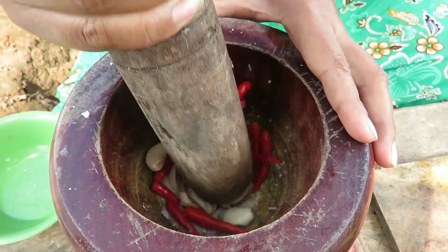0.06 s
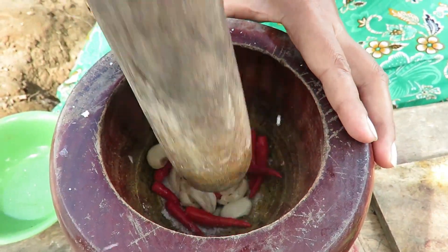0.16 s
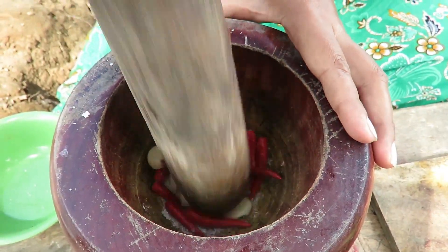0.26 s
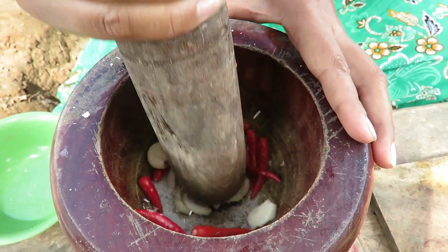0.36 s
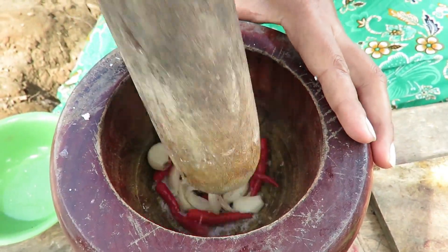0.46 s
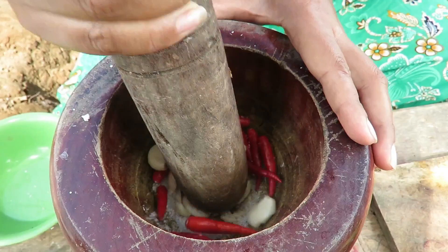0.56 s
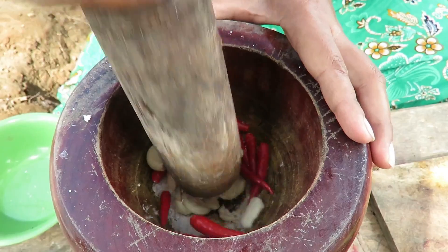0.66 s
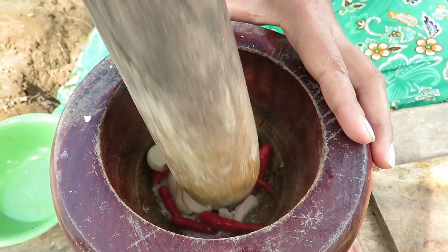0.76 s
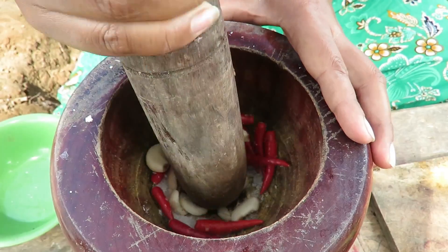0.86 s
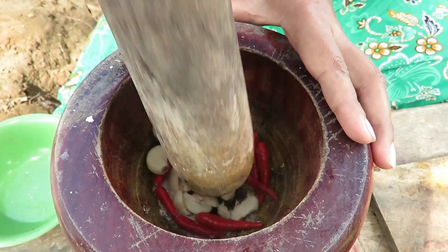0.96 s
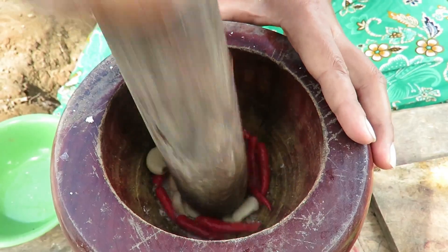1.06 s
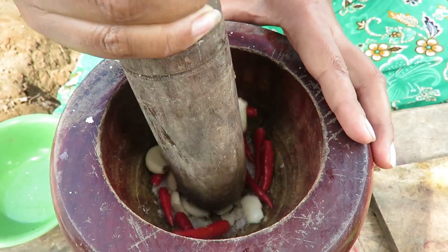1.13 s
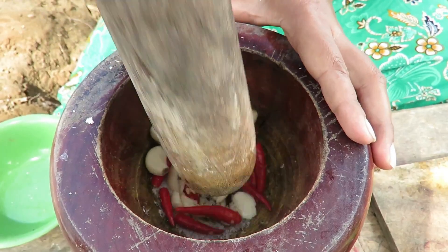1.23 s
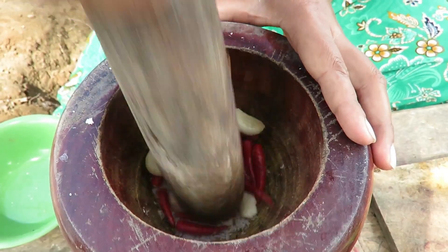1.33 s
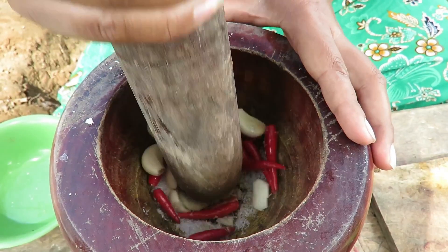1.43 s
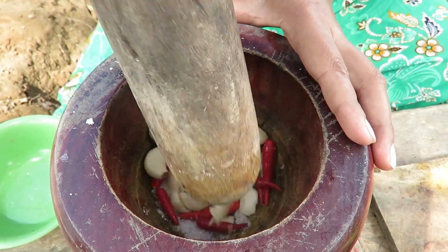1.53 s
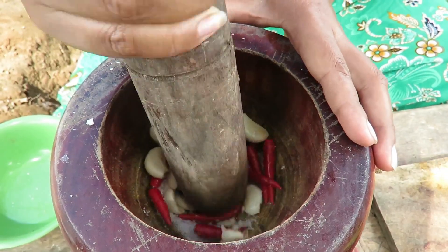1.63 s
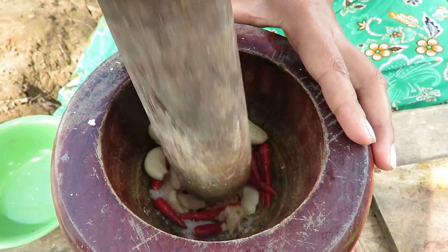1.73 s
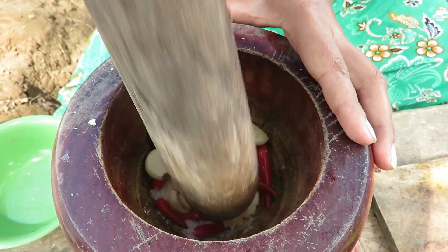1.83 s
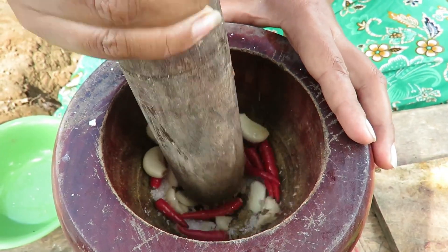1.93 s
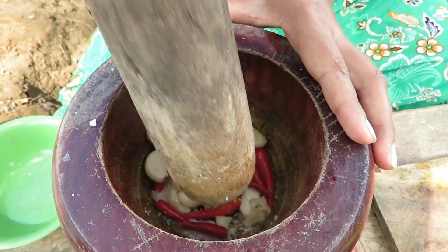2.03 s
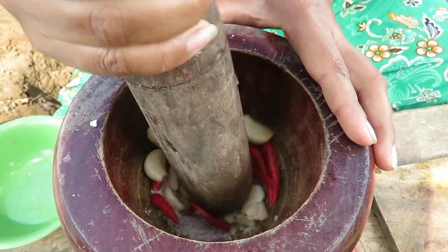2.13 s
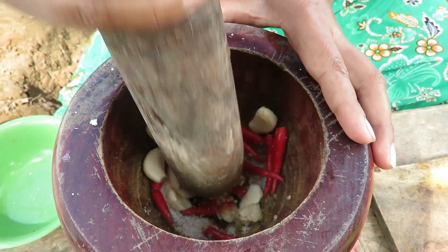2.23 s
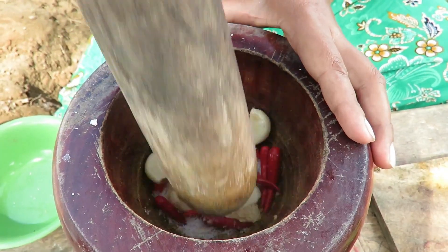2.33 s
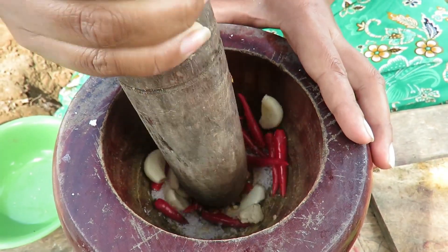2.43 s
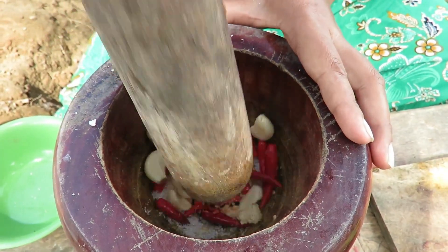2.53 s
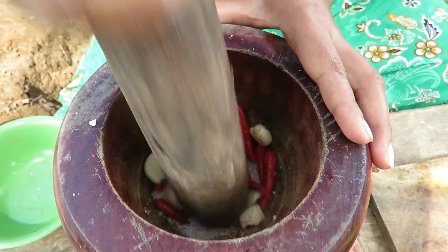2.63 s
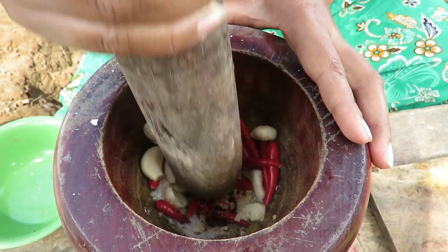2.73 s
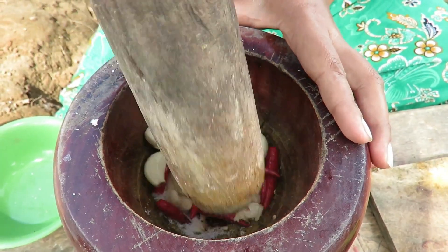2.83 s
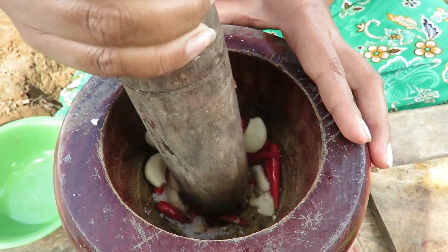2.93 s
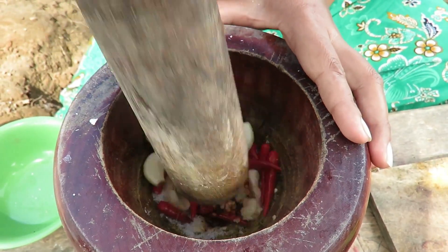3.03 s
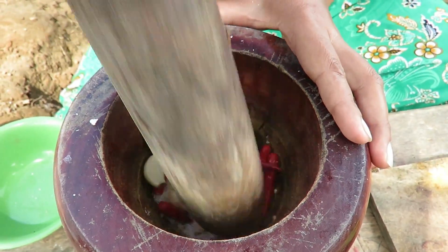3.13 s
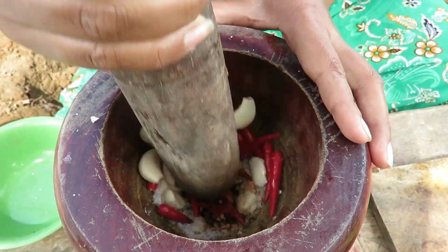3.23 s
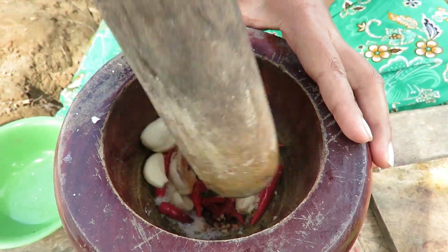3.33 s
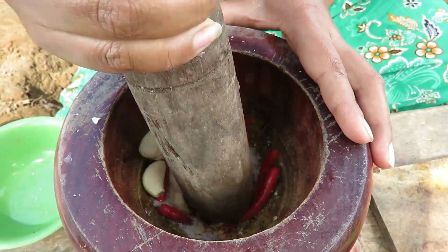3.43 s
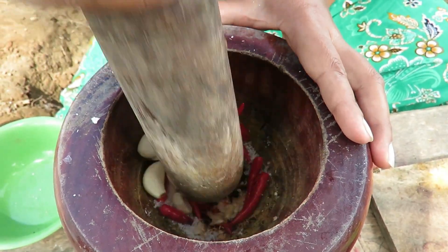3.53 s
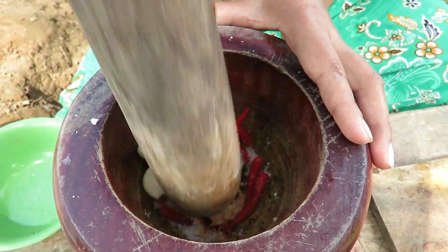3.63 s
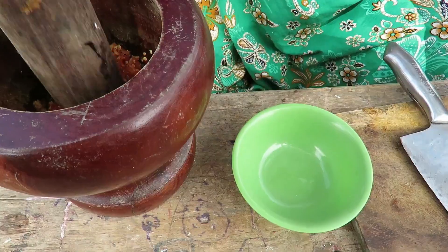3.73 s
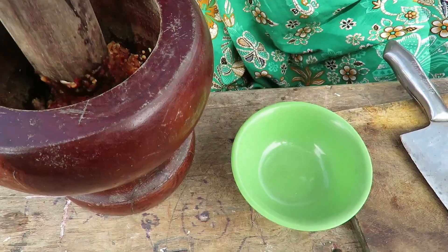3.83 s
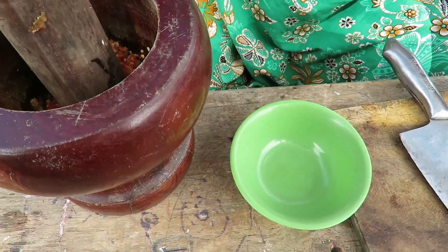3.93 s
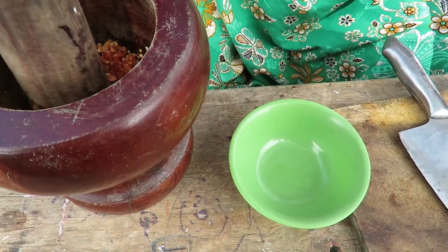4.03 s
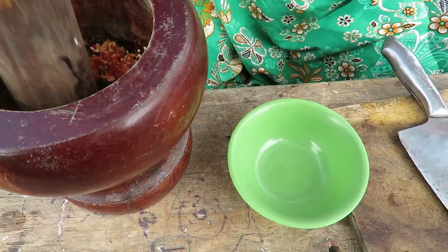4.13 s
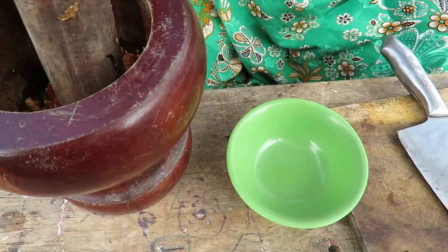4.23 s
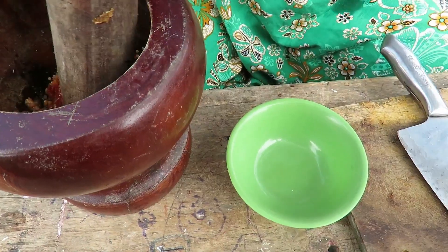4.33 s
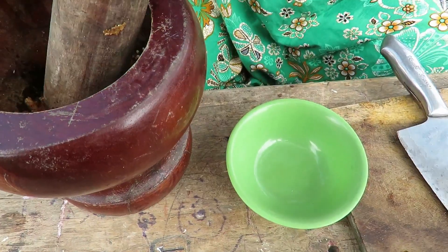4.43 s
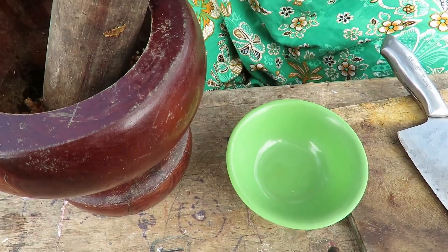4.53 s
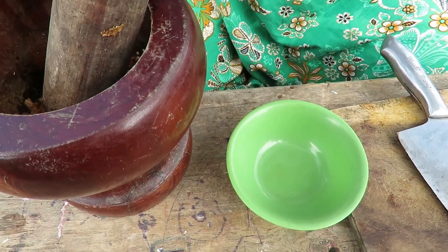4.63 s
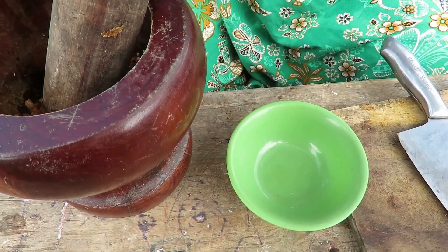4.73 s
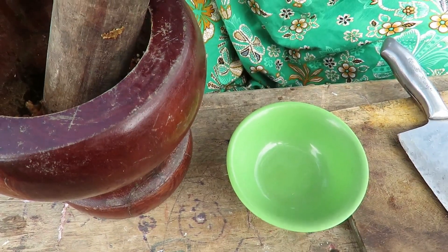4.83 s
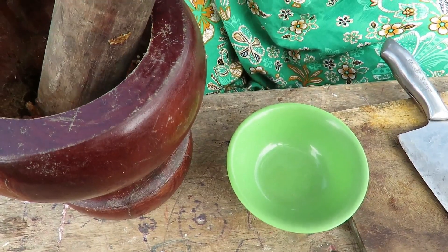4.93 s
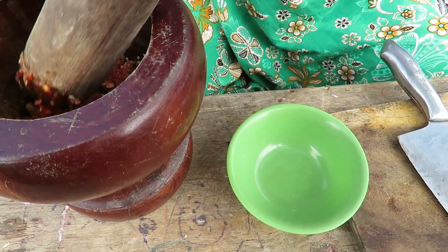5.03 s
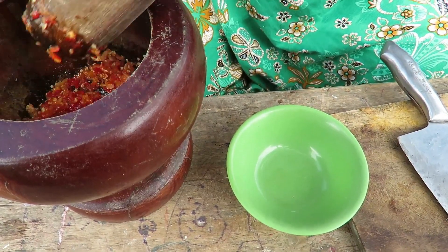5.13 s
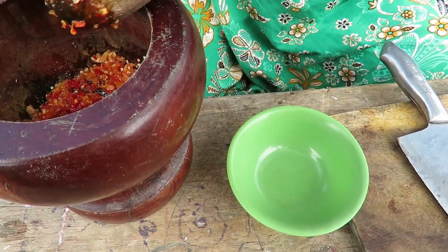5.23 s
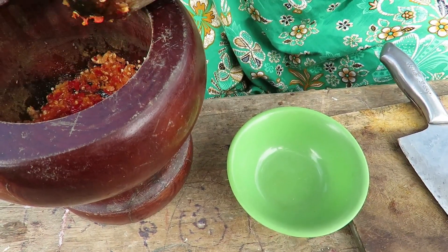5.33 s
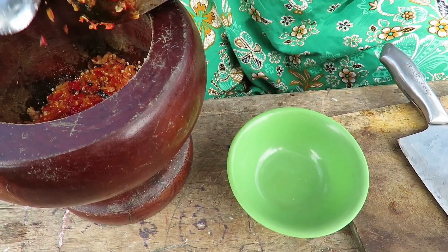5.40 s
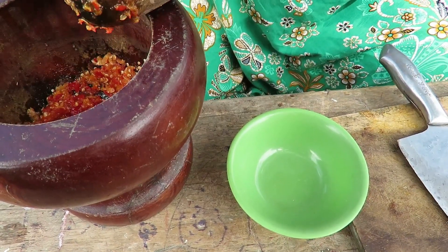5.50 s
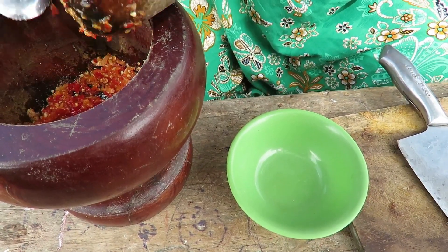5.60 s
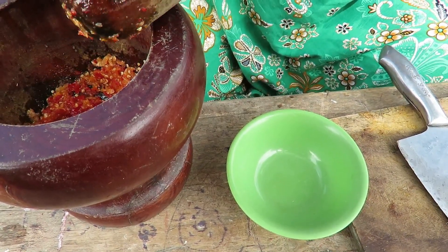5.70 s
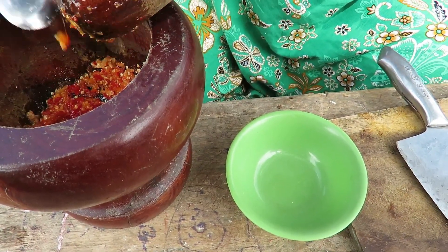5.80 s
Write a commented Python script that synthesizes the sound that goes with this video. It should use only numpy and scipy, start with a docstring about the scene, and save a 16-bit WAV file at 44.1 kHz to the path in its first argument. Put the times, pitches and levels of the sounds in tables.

```python
"""Outdoors, close to a stereo microphone: a faint background rush, shaped noise, runs under everything.
From the start a wooden pestle pounds chilies, garlic and salt: damped modes thump and knock the mortar,
noise fractures crunch, and the foot rocks on a plank bench. From 3.6 s wet paste squelches in noise bursts
and the pestle bumps the bowl; the background rush is abruptly louder from 3.8 s. From 4.7 s a utensil taps
the pestle (modes and noise); near the end the pestle rubs and the utensil scrapes, both grainy noise."""
import sys
import numpy as np
from scipy import signal
from scipy.fft import rfft, irfft, next_fast_len
from scipy.io import wavfile
from scipy.ndimage import map_coordinates

SR = 44100
rng = np.random.default_rng(int(sys.argv[2]) if len(sys.argv) > 2 else 0)


def wav_out(sig):
    """Save sig, one row per channel (or a flat mono array), as 16-bit PCM at SR to the path in sys.argv[1]."""
    wavfile.write(sys.argv[1], SR, np.round(np.clip(np.atleast_2d(sig).T, -1, 1) * 32767).astype(np.int16))


N = 258426
TIME = np.arange(N) / SR  # s, whole scene
AGE = np.arange(SR // 5) / SR  # s, within one short sound


def amp(db):
    """Decibels to gain."""
    return 10 ** (np.asarray(db) / 20)


def unit(x):
    """Scale to rms 1."""
    return x / np.sqrt(np.mean(x ** 2) + 1e-20)


def along(points, hz):
    """Interpolate (Hz, value) points on a log frequency axis."""
    f, v = np.transpose(points)
    return np.interp(np.log(hz + 1), np.log(f + 1), v)


def level(rows):
    """Gain per sample from (s, dB) rows."""
    return amp(np.interp(TIME, *np.transpose(rows)))


def wobble(rate):
    """A smooth random curve, rate knots a second."""
    knots = rng.standard_normal(int(N * rate / SR) + 4)
    return map_coordinates(knots, [TIME * rate])


def filtered(x, response):
    """Multiply the spectrum of x by a complex response of frequency."""
    size = x.shape[-1]
    padded = next_fast_len(size + SR // 5)
    hz = np.fft.rfftfreq(padded, 1 / SR)
    return irfft(rfft(x, padded) * response(hz), padded)[..., :size]


def coloured(x, spectrum):
    """x shaped by a spectrum, at rms 1."""
    return unit(filtered(x, lambda hz: amp(along(spectrum, hz))))


def hiss():
    """Plain noise for one short sound."""
    return rng.standard_normal(len(AGE))


def decay(t60):
    """Exponential fall of 60 dB in t60 seconds."""
    return amp(-60 * AGE / t60)


def onset(attack):
    """Exponential build-up with a time constant in seconds."""
    return 1 - np.exp(-AGE / attack)


def add(track, s, sound):
    """Mix a sound into the track from time s."""
    start = round(s * SR)
    sound, start = sound[max(-start, 0):], max(start, 0)
    track[start:start + len(sound)] += sound[:N - start]


def grains(size, spread_db):
    """Dense tiny fractures of very unequal size."""
    sizes = amp(spread_db * rng.standard_normal(size))
    return unit(rng.standard_normal(size) * sizes)


def ring(modes, attack, scatter_db, detune):
    """Damped modes with peak 1; their strengths depend on where the contact lands."""
    hz, db, t60 = np.transpose(modes)[:, :, None]
    size, shift = rng.standard_normal((2, len(modes), 1))
    sign = np.where(np.arange(len(modes)) % 2, -1, 1)[:, None]
    envelope = amp(db + scatter_db * size - 60 * AGE / t60)
    tones = np.sin(2 * np.pi * hz * (1 + detune * shift) * AGE)
    wave = np.sum(sign * envelope * tones, 0) * onset(attack)
    return wave / np.abs(wave).max()


# likeness of the rush at the two capsules: (f/Hz, left-right correlation)
RUSH_LIKENESS = [(30, .6), (120, 0.92), (500, 0.9), (2000, 0.84), (8000, 0.36)]


def stereo_rush(spectrum, flutter_db=.4):
    """Stereo noise, alike at both capsules in most of the range and less so in the treble."""
    def turn(hz):
        return np.arccos(np.clip(along(RUSH_LIKENESS, hz), -1, 1)) / 2

    noise = rng.standard_normal((2, N))
    mid, side = filtered(noise, lambda hz: np.array([np.cos(turn(hz)), np.sin(turn(hz))]))
    return coloured(np.array([mid + side, mid - side]), spectrum) * amp(flutter_db * wobble(8.8))


# colour of the background rush before and after its step in level: (f/Hz, relative level/dB)
RUSH_BEFORE_COLOUR = [(15, -52), (25, -7.5), (190, -10), (256, -1), (335, -9), (451, -1), (545, -3),
                      (677, -7), (1480, -9.5), (1890, -12.5), (2760, -15.5), (3080, -18.5), (9840, -38),
                      (12500, -45.5), (16000, -84)]
RUSH_AFTER_COLOUR = [(15, -42), (25, -14.5), (200, -5), (270, 0), (394, -6.5), (489, 1), (754, -9),
                     (988, -7), (1610, -10.5), (2410, -16.5), (2690, -18), (7510, -34), (11600, -42.5),
                     (13600, -49), (16000, -64)]
# course of the rush before and after the step, ahead of the trims: (t/s, level/dB)
RUSH_BEFORE_LEVEL = [(0.0, -51), (0.45, -47.5), (0.69, -49), (0.81, -54.5), (1.32, -60), (2.87, -51),
                     (3.04, -51.5), (3.19, -59.5), (3.77, -57)]
RUSH_AFTER_LEVEL = [(3.79, -41), (3.97, -46), (4.48, -41.5), (4.85, -43.5), (5.86, -37.5)]
RUSH_STEP_S = 3.787
RUSH_BEFORE_TRIM_DB, RUSH_AFTER_TRIM_DB = 2, 1


def background_rush():
    """A faint background rush; its level dips after the hardest strokes, creeps back and is later louder."""
    before = amp(RUSH_BEFORE_TRIM_DB) * level(RUSH_BEFORE_LEVEL) * stereo_rush(RUSH_BEFORE_COLOUR)
    after = amp(RUSH_AFTER_TRIM_DB) * level(RUSH_AFTER_LEVEL) * stereo_rush(RUSH_AFTER_COLOUR)
    return np.where(TIME < RUSH_STEP_S, before, after)


# deep modes of mortar and bench: (ratio to thump pitch, relative level/dB, ratio to thump t60)
THUMP_MODES = [(0.9726, 15, 0.79), (0.692, -29.5, 3.3), (2.2, -24, 1.1), (1.64, -13.5, 2.27)]


def thump(pitch_hz, t60, attack=0.0094):
    """The deep note of the mortar standing on its bench; it takes a few cycles to build."""
    modes = [(pitch_hz * ratio, db, t60 * life) for ratio, db, life in THUMP_MODES]
    return -ring(modes, attack, scatter_db=1.2, detune=.01)


# hollow modes of the bowl: (f/Hz, relative level/dB, t60/s)
BOWL_MODES = [(601, -4.5, 0.044), (695, 1.5, 0.031), (801, -8, 0.02)]


def knock():
    """The hollow note of the bowl."""
    return ring(BOWL_MODES, attack=.0008, scatter_db=2, detune=.025)


# higher modes of a hard contact: (f/Hz, relative level/dB, t60/s)
EDGE_MODES = [(939, -7, 0.076), (1180, 0, 0.025), (1390, -7.5, 0.054), (1608, 2, 0.025),
              (2090, -26.5, 0.0067), (2200, -16, 0.054)]
# the wood's crowd of short-lived modes: (f/Hz, relative level/dB)
TIMBER_COLOUR = [(200, -50), (450, -2), (800, 9.5), (1500, 2), (2100, -10.5), (3000, -15.5), (5000, -25.5),
                 (10000, -44)]


def edge(t60=0.031):
    """Bare wood meets bare wood: a few clear modes over a dense, dry clatter."""
    clatter = coloured(hiss(), TIMBER_COLOUR) * decay(t60) * onset(0.00021)
    note = ring(EDGE_MODES, attack=.0003, scatter_db=2.5, detune=.03)
    return amp(-6) * note + amp(-7.0) * clatter


# the bench giving under a blow: (f/Hz, level re thump/dB, t60/s)
BENCH_MODES = [(130, -5.5, 0.023), (48, -33, 0.14)]
# ring of a 0 dB blow; how strongly softer blows lengthen it
THUMP_T60_S, SOFT_BLOW_LENGTHENING = .029, 0.23


def blow(db, pitch_hz, knock_db, edge_db, lag, rebound_db, rebound_hz=272, rebound_t60=0.036):
    """One blow rings the bowl, shoves the bench and settles with a second contact; soft blows ring longer."""
    push = sum(amp(gain) * decay(t60) * np.sin(2 * np.pi * hz * AGE) for hz, gain, t60 in BENCH_MODES)
    push = push * onset(0.0071)
    first = thump(pitch_hz, THUMP_T60_S * amp(-SOFT_BLOW_LENGTHENING * db)) + push
    first = first + amp(knock_db) * knock() + amp(edge_db) * edge()
    second = thump(rebound_hz, rebound_t60) + amp(-12.5) * knock() + amp(-8.5) * edge()
    delayed = np.pad(second, (round(abs(lag) * SR), 0))[:len(AGE)]
    return amp(db) * (first + amp(rebound_db) * delayed)


# pestle strokes, also heard in crunch and rocking: (t/s, thump level/dB, thump pitch f/Hz,
# knock re thump/dB, bare wood re thump/dB, second contact delay/s, second contact re thump/dB,
# rocking level/dB, crunch level/dB before its trim, time spent crushing/s)
STROKES_PLAYED = [(0.0, -23, 269, -5, -4, .0105, 3.5, -31.5, -46, .001),
                  (0.2215, -6, 220, -11.5, -7.5, 0.008, -6.5, -19.5, -24, 0.0075),
                  (0.4872, -7.5, 233, -15.5, -7, 0.0072, 5, -18.5, -20.5, 0.0035),
                  (0.747, 0.5, 254, -11.5, -9.5, 0.012, -17, -22.5, -20.5, 0.00016),
                  (1.0156, -4.5, 271, -1, 1, 0.01, -18.5, -29, -28, 0.00032),
                  (1.2773, -9.5, 252, -0.5, -11, 0.0077, -3.5, -24, -33.5, 0.0019),
                  (1.547, -22, 224.5, -24, -11.5, 0.013, 4, -28, -29, 0.0019),
                  (1.811, -6, 242, -9.5, -7, 0.012, -8, -25, -26, 0.00059),
                  (2.0685, -3.5, 259.5, -19, -16, 0.013, -10.5, -23.5, -28.5, .001),
                  (2.329, -13, 245, -20, -16, 0.014, -8.5, -24, -29.5, .0035),
                  (2.5847, -12, 243, -6.5, -4, .0124, 6.5, -17, -28, 0.00096),
                  (2.846, -1.5, 259, -15, -14, 0.013, -8, -18, -23.5, 0.0006),
                  (3.101, 0, 268, -14, -18, .0141, -16, -24, -22, 0.00028),
                  (3.3654, -5.5, 288, -6, -15, 0.012, -11, -24, -35, 0.00041),
                  (3.6136, -26.5, 195.7, -10, -6, 0.016, -4, -43.5, -36.5, .006),
                  (3.8229, -2, 230, -18, -26.5, 0.009, -9, -37, -40.5, 0.0065),
                  (4.0888, -5.5, 246.4, -7, -9, .011, -4.5, -36, -42, 0.0006),
                  (4.3442, -16.5, 234, -9.5, -9, .0093, 2, -28, -38, 0.0066),
                  (4.5571, -4, 254.5, -13, -11.5, 0.014, -8.5, -32, -56.5, 0.00086)]
# bumps on the bowl while working the paste: (t/s, level/dB, pitch f/Hz, knock re thump/dB)
BOWL_BUMPS = [(3.907, -22, 229, -16), (4.1209, -8, 251, -9), (4.1354, -9.5, 215, -31),
              (4.1617, -18, 237, -13), (4.2047, -24.5, 222, -23), (4.3585, -12, 237, -10),
              (4.3767, -8.5, 261, -8), (4.431, -11.5, 229, -16)]
# second contact of a bump: delay, level re its first; bare-wood clatter re the bump's knock
BUMP_LAG_S, BUMP_REBOUND_DB, BUMP_EDGE_DB = 0.015, -13.5, -7.5


def pestle():
    """Full strokes, and bumps against the bowl once the food is a paste."""
    out = np.zeros(N)
    for s, db, pitch_hz, knock_db, edge_db, lag, rebound_db, *_ in STROKES_PLAYED:
        add(out, s, blow(db, pitch_hz, knock_db, edge_db, lag, rebound_db))
    for s, db, pitch_hz, knock_db in BOWL_BUMPS:
        edge_db = knock_db + BUMP_EDGE_DB
        add(out, s, blow(db, pitch_hz, knock_db, edge_db, BUMP_LAG_S, BUMP_REBOUND_DB))
    return out


# colour of breaking food before the treble tilt: (f/Hz, relative level/dB)
CRUNCH_COLOUR = [(150, -12), (600, 7.5), (1500, -2.5), (2500, 1), (4500, -2), (7000, -8.5), (10500, -13),
                 (14000, -18), (16000, -36.5)]
CRUMBLE_DB, CRUMBLE_S = -18.5, .007  # crumbs go on breaking after the burst


def crackle(rise, release, treble_db):
    """A burst of fractures that swells to its peak, drops and crumbles away; the peak is in the middle."""
    t = AGE - AGE.mean()
    fractures = grains(len(t), spread_db=4.5)
    tilt = [(3000, 0.092), (10000, 0.83)]  # (Hz, share of treble_db)
    sound = filtered(fractures, lambda hz: amp(along(CRUNCH_COLOUR, hz) + treble_db * along(tilt, hz)))
    before, after = np.maximum(-t, 0), np.maximum(t, 0)
    fall = np.exp(-after / release) + amp(CRUMBLE_DB) * np.exp(-after / CRUMBLE_S)
    return unit(sound) * np.exp(-before / rise) * fall


# single seeds and salt grains snapping, before the crunch trim: (t/s, level/dB)
SEED_SNAPS = [(2.333, -34), (3.644, -47.5), (4.0848, -21), (4.096, -29), (4.232, -55), (4.604, -44.5),
              (5.123, -44)]
# thin food bursts at contact; thick food earlier and slower
CRUNCH_LAG_S, CRUNCH_RISE_S, CRUNCH_RELEASE_S, CRUNCH_SPREAD = .001, .0018, 0.0014, 0.21
COARSE_TREBLE_DB, FINER_DB_PER_S = -8.5, 2  # the crunch brightens as the food gets finer
SNAP_RISE_S, SNAP_TREBLE_DB = 0.0012, 8.5


def crushing(trim_db=2):
    """Salt and chili skin crackle ever harder until the pestle bottoms out; a few grains snap on their own."""
    out = np.zeros(N)
    for s, *_, db, crush_s in STROKES_PLAYED:
        slower = CRUNCH_SPREAD * abs(crush_s)
        treble_db = COARSE_TREBLE_DB + FINER_DB_PER_S * s
        burst = crackle(CRUNCH_RISE_S + slower, CRUNCH_RELEASE_S + slower, treble_db)
        add(out, s + CRUNCH_LAG_S - crush_s - AGE.mean(), amp(db) * burst)
    for s, db in SEED_SNAPS:
        snap = crackle(SNAP_RISE_S, CRUNCH_RELEASE_S, SNAP_TREBLE_DB)
        add(out, s - AGE.mean(), amp(db) * snap)
    return amp(trim_db) * out


# loose dirt under the mortar's foot: (f/Hz, relative level/dB)
GRIT_COLOUR = [(150, -5), (350, 7.5), (800, 4), (1400, -4), (2000, -17), (3000, -25.5), (5000, -33),
               (10000, -45.5)]
# the foot lands this long after a stroke; base level of its clatter
ROCK_DELAY_S, ROCK_CLATTER_DB = .047, -3


def rocking(pitch_hz=268, t60=0.05, period=.033, loss_db=10.0, spread=0.00973, width=0.013, count=4, size=3):
    """The foot drops back on the planks in ever weaker bumps, each with a loose, gritty clatter."""
    out, t = np.zeros(N), AGE - .1
    for s, *_, db, _, _ in STROKES_PLAYED:
        for bump in range(count):
            when = s + ROCK_DELAY_S + bump * period
            bump_db = db - bump * loss_db
            grit = coloured(grains(len(t), spread_db=0.5), GRIT_COLOUR) / np.cosh(2 * t / width)
            add(out, when - .007, amp(bump_db - 2.5) * thump(pitch_hz, t60, attack=0.036))
            add(out, when + t[0], amp(bump_db + ROCK_CLATTER_DB - 3.6 * bump - 7.5) * grit)
            # small contacts scattered around the landing
            for lag, force in zip(rng.uniform(-0.988, 1, size), rng.standard_normal(size)):
                clatter = amp(ROCK_CLATTER_DB - 2 * bump - 16) * knock()
                plank_hz = pitch_hz * np.exp(0.134 * rng.standard_normal())
                plank = amp(-5.5) * thump(plank_hz, t60=0.056)
                add(out, when + spread * lag, amp(bump_db + 2 * force) * (clatter + plank))
    return out


# wet pulp squeezed out from under the pestle, before a 2 dB lift: (t/s, level/dB, t60/s)
PULP_SQUELCHES = [(3.606, -37, 0.19), (3.824, -23.5, 0.07), (3.852, -27.5, 0.023), (4.09, -33.5, 0.24),
                  (4.186, -38.5, .06), (4.358, -33.5, 0.15), (4.407, -25.5, 0.044), (4.56, -31.5, 0.13)]
# colour of the wet paste: (f/Hz, relative level/dB)
PASTE_COLOUR = [(200, 7), (700, 10.5), (1500, 3.5), (2500, 4), (3500, -6.5), (5000, -11.5), (8000, -24),
                (14000, -38.5), (16000, -47)]


def squelching(attack=0.00097):
    """Seeds and wet pulp spit out sideways in decaying bursts of uneven grains."""
    out = np.zeros(N)
    for s, db, t60 in PULP_SQUELCHES:
        pulp = coloured(grains(len(AGE), spread_db=7.5), PASTE_COLOUR)
        add(out, s, amp(db + 2) * decay(t60) * onset(attack) * pulp)
    return out


# utensil on the pestle: (t/s, level/dB, chatter re tap/dB, wood note re tap/dB before a 17.5 dB cut)
UTENSIL_TAPS = [(4.7299, -8, -22, -1.5), (5.4845, -1, -29, -15), (5.708, -31.5, -23, -25),
                (5.7198, -4.5, -6.5, -18)]
# modes of utensil against wood: (f/Hz, relative level/dB, t60/s)
UTENSIL_MODES = [(672, -6, 0.069), (1608, 8, 0.034), (2220, -27, 0.021), (2670, -24, 0.0062),
                 (2980, -21, 0.049), (3470, 9, 0.016), (3920, -24, 0.022), (4700, 15.5, 0.0068),
                 (5110, -8.5, 0.023), (6460, -20, 0.022), (7480, -1.5, 0.037), (9070, -15, 0.035),
                 (12800, -8, 0.021), (12400, -23, .012)]
# snap of the utensil on wood: (f/Hz, relative level/dB)
SNAP_COLOUR = [(300, -10), (900, -10), (1700, -5), (3300, 1.5), (4800, -2.5), (6000, -11.5), (8000, -12),
               (12500, -24), (16000, -32)]


def tapping(chatter_s=0.0064, snap_t60=0.002, rattle_t60=0.024):
    """A sharp snap, the utensil's short dense ring, a dull note from the pestle and a quick chatter."""
    out = np.zeros(N)
    for s, db, chatter_db, wood_db in UTENSIL_TAPS:
        for lag, contact_db in [(0, db), (chatter_s, db + chatter_db)]:
            snap_fall = amp(-6.5) * decay(snap_t60) + amp(-14.0) * decay(rattle_t60)
            crack = snap_fall * coloured(hiss(), SNAP_COLOUR)
            dull = amp(wood_db - 17.5) * decay(0.026) * coloured(hiss(), TIMBER_COLOUR)
            note = amp(-7.5) * ring(UTENSIL_MODES, attack=.00005, scatter_db=1.5, detune=.008)
            add(out, s + lag, amp(contact_db) * (crack + dull + note))
    return out


# a long rub of the pestle, then a short low thump of the mortar at the last tap:
# (t/s of the peak, level/dB, rise/s, fall/s)
RUB_AND_LOW_THUMP = [(5.42, -34.5, 0.21, .11), (5.729, -28, 0.0056, 0.014)]
# colour of both, strongest at the bowl's deep note: (f/Hz, relative level/dB)
LOW_MURMUR_COLOUR = [(80, -46), (170, -11.5), (255, 2), (340, -22), (500, -20), (700, -18.5), (1500, -25),
                     (4000, -50)]


def rubbing():
    """The pestle drags unevenly and the bowl murmurs at its deep note; the last tap adds a low thump."""
    swell = np.zeros(N)
    for s, db, rise, fall in RUB_AND_LOW_THUMP:
        width = np.where(TIME < s, rise, fall)
        swell += amp(db) * np.exp(-((TIME - s) / width) ** 2)
    return swell * amp(1.3 * wobble(35)) * coloured(grains(N, spread_db=-1), LOW_MURMUR_COLOUR)


# utensil drawn along the pestle: (t/s, length/s, level/dB, squeak re rasp/dB, squeak pitch ratio)
UTENSIL_SCRAPES = [(5.499, 0.059, -35, 6, 1.02), (5.725, 0.048, -35, -4, 0.99),
                   (5.755, .016, -32.5, -15.5, .9)]
# squeak of the scraping edge, before sharpening and pitch ratio: (f/Hz, width/Hz, relative level/dB)
SQUEAK_MODES = [(3870, 220, -2.5), (4600, 280, -10), (6470, 590, -12), (7300, 330, -16.5),
                (10150, 700, -18), (13700, 300, -20)]
# rasp of the edge through the paste: (f/Hz, relative level/dB)
RASP_COLOUR = [(200, -22), (500, -18), (750, 18), (1100, -17), (1700, 5.5), (2400, 2), (3600, -3.5),
               (5500, -11), (8000, -20), (14000, -30), (16000, -52)]


def scraping(sag=0.13):
    """The edge rasps through the paste and squeaks on the wood, the squeak sagging as the stroke ends."""
    def resonances(f):
        return sum(amp(db) * 1j * f * w / (c * c - f * f + 1j * f * w) for c, w, db in SQUEAK_MODES)

    def sharpened(f):
        return resonances(f) * np.sqrt(np.abs(resonances(f)))

    out = np.zeros(N)
    for s, length, db, squeak_db, pitch in UTENSIL_SCRAPES:
        progress = np.minimum(AGE / length, 1)
        slips = grains((2, len(AGE)), spread_db=4.5)
        squeak = unit(filtered(slips[0], sharpened))
        # reading the squeak ever slower lowers its pitch
        squeak = map_coordinates(squeak, [pitch * np.cumsum(1 - sag * progress ** 4)])
        stroke = np.abs(np.sin(np.pi * progress)) ** 0.89 * amp(1.5 * wobble(210)[:len(AGE)])
        rasp = coloured(slips[1], RASP_COLOUR)
        add(out, s, amp(db) * stroke * (rasp + amp(squeak_db) * squeak))
    return out


def bass_thinned(x, low_cut_hz=90, leak_db=-7):
    """The wood sounds are thinned in the deep bass."""
    thin = signal.lfilter(*signal.butter(2, low_cut_hz, "high", fs=SR), x)
    return thin + amp(leak_db) * (x - thin)


def placed(x, lead_ms, pan_db):
    """The left capsule hears a source lead_ms earlier and pan_db louder than the right."""
    side = np.array([[.5], [-.5]])
    return amp(side * pan_db) * filtered(x, lambda hz: np.exp(2j * np.pi * hz * side * lead_ms / 10 ** 3))


def surroundings(x, t60=0.041):
    """Faint dull reflections off the bench and the ground, as a decaying noise tail."""
    dulling = [(150, -0.5), (600, -2.5), (3000, -3.5), (12000, -7)]  # (Hz, dB)
    tail = filtered(rng.standard_normal((2, len(AGE))), lambda hz: amp(along(dulling, hz)))
    tail = tail * decay(t60) * (AGE > .003)  # first reflection after 3 ms
    return signal.fftconvolve(x[None], tail / np.linalg.norm(tail[0]), axes=1)[:, :N]


def scene():
    """Mortar, food and utensil close in front of the microphone, in open air."""
    wood = bass_thinned(pestle() + rocking() + rubbing())
    food = crushing() + squelching()
    utensil = tapping() + scraping()
    direct = placed(wood, lead_ms=0.03, pan_db=0.0)
    direct = direct + placed(food, lead_ms=0.0066, pan_db=.3)
    direct = direct + placed(utensil, lead_ms=0.021, pan_db=1)
    return direct + amp(-22.5) * surroundings(wood + food + utensil) + background_rush()


TOP_HZ = 16300  # band limit


def record(dry):
    """Peaks are clipped just below full scale, then everything above the band limit is removed."""
    return filtered(np.clip(dry, -.99, .99), lambda hz: hz < TOP_HZ)


dry = scene()
out = record(dry)
wav_out(out)
```